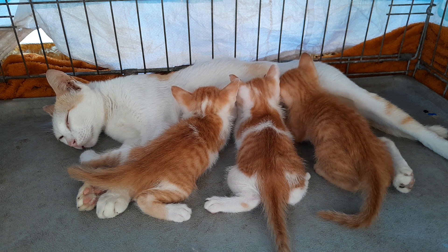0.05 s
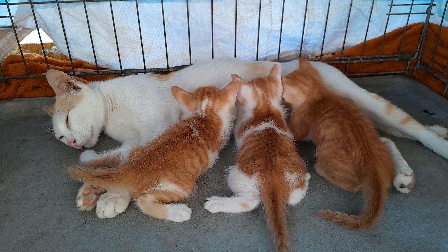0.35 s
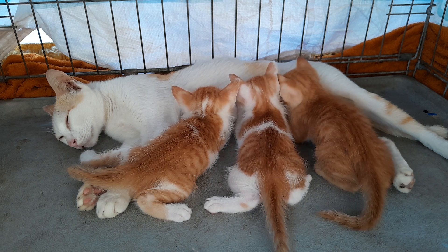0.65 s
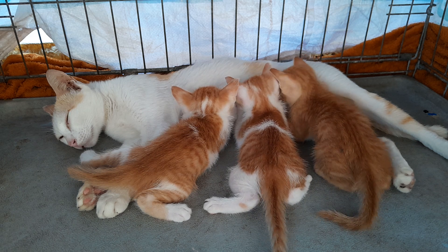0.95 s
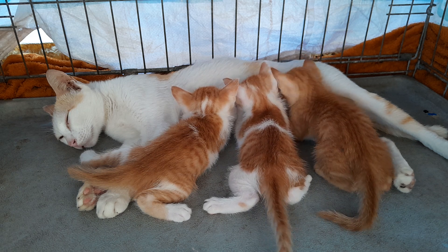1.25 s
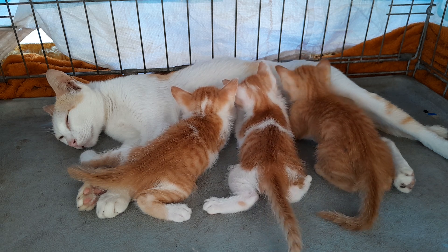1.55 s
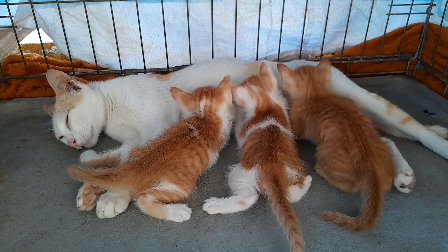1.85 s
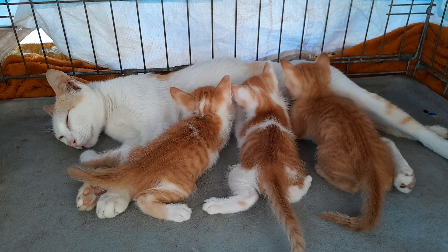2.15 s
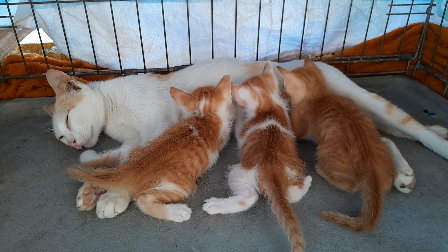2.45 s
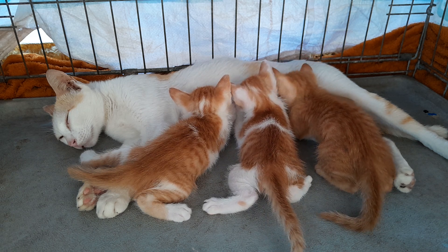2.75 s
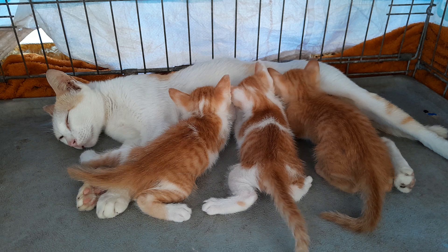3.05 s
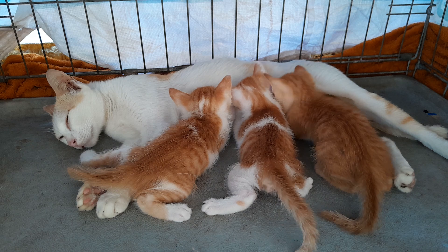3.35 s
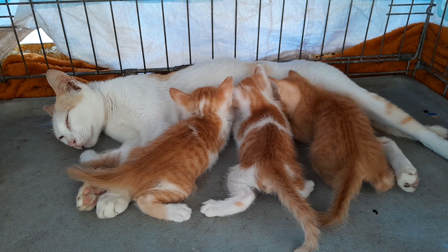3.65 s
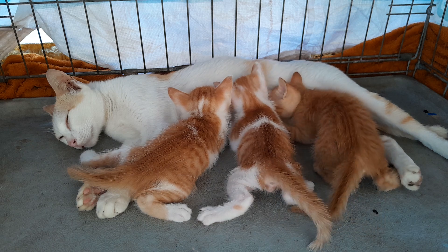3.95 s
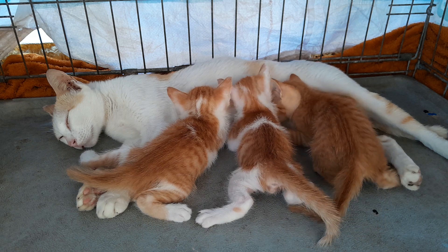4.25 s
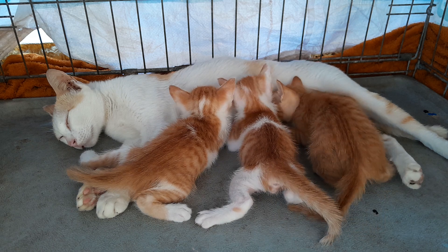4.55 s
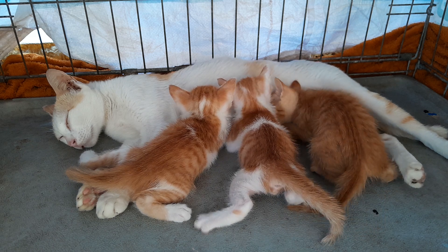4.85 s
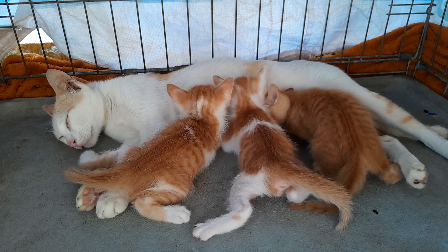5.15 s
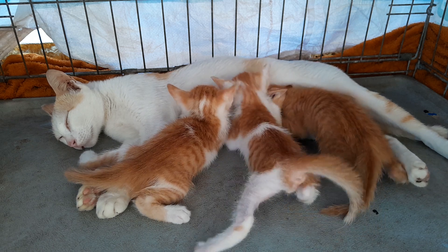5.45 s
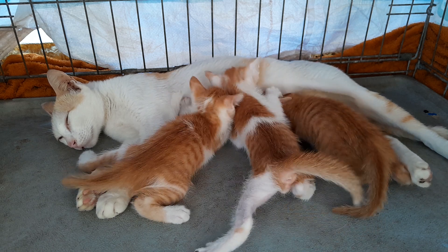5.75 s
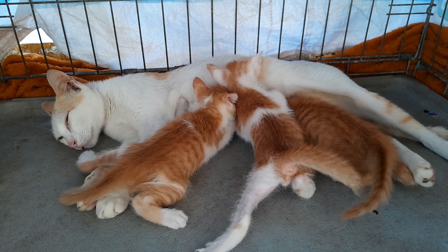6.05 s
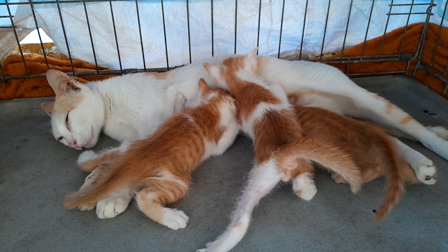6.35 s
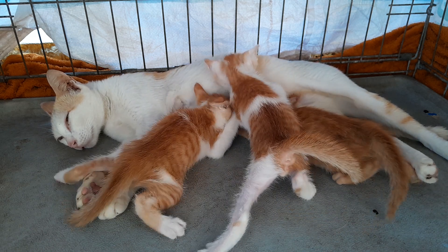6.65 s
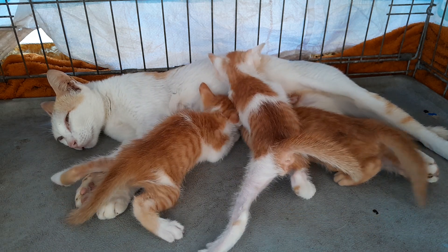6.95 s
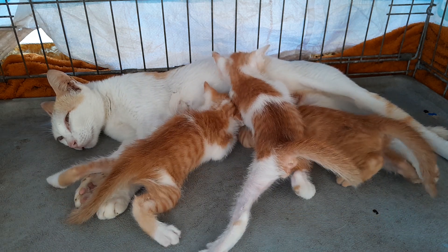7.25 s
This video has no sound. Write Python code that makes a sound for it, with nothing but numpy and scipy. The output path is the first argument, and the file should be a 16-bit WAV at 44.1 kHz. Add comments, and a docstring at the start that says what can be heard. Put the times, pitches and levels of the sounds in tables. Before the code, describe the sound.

Close up in a wire cage indoors, a low purring rumble runs throughout over faint hiss. At first only a few thin, falling chirps, like a small bird's, echo from further away. Then nursing kittens begin to jostle, with wet mouth smacks, claw ticks and fur rubbing against a hollow tray. The activity builds to a short flurry and eases to scattered clicks, with a soft low thump near the end.

```python
"""In a wire cage, kittens suckle and jostle at their mother's belly over a low purring rumble.
Mouths and claws click, paws and fur scuff; both ring in the floor tray and, faintly, in the wires.
A kitten's weight thumps softly on the floor. Thin, mostly falling chirps like a small bird's echo
from further off. Behind it all lie dull room noise, hiss and faint, very high squeaks."""
import sys
import numpy as np
from scipy import signal
from scipy.fft import rfft, irfft, next_fast_len
from scipy.io import wavfile
from scipy.ndimage import uniform_filter1d

SR = 44100
rng = np.random.default_rng(int(sys.argv[2]) if len(sys.argv) > 2 else 0)


def output_pcm(signal):
    """Save a mono or channel-first signal as 16-bit PCM at the path in sys.argv[1].

    Samples are clipped to [-1, 1] before scaling.
    """
    pcm = np.clip(np.atleast_2d(signal).T, -1, 1) * 32767
    wavfile.write(sys.argv[1], SR, np.round(pcm).astype(np.int16))


N = 325753
STIR_S = 3.8   # faint rubbing and suckling start here

# Spectrum of ticks and rubbing hiss. Each row: frequency in Hz, density in dB.
TICK_SPECTRUM = [(900, 0.5), (1800, -1), (2900, -1.5), (3700, 0.5), (5000, 0.5), (7000, 1), (8200, -1.5),
                 (10000, -4.5), (13000, -5.5), (16000, -7.5)]
# Stereo image of close sounds and echoes. Each row: frequency in Hz, left-right correlation.
NEAR_CORRELATION = [(400, 0.82), (800, 0.71), (1500, 0), (2500, 0)]


def from_db(db):
    """Decibels to gain."""
    return 10 ** (np.asarray(db) / 20)


def unit_rms(x):
    """Scale to unit power."""
    return x / np.sqrt(np.mean(x ** 2) + 1e-20)


def add(out, start_s, sound):
    """Mix a short sound in at start_s."""
    start = max(int(start_s * SR), 0)
    out[..., start:start + sound.shape[-1]] += sound[..., :N - start]


def at_bins(curve, size):
    """Interpolate (Hz, value) rows at the FFT bins, in log frequency."""
    hz, value = np.transpose(curve)
    return np.interp(np.log(np.fft.rfftfreq(size, 1 / SR) + 1), np.log(hz), value)


def colour(x, spectrum):
    """Filter by a curve of (Hz, dB) rows."""
    size = next_fast_len(x.shape[-1])
    return irfft(rfft(x, size) * from_db(at_bins(spectrum, size)), size)[..., :x.shape[-1]]


def lowpass(x, cut_hz):
    """Second-order treble cut."""
    return signal.sosfilt(signal.butter(2, cut_hz, fs=SR, output="sos"), x)


def resonate(x, hz, width_hz):
    """One resonance, unit peak gain."""
    r = np.exp(-np.pi * width_hz / SR)
    feedback = [1, -2 * r * np.cos(2 * np.pi * hz / SR), r * r]
    return signal.lfilter(np.array([1, 0, -1]) * (1 - r * r) / 2, feedback, x + 1e-18)


def stereo_noise(size, correlation=NEAR_CORRELATION):
    """White noise, left and right alike in the bass and unrelated in the treble."""
    alike = at_bins(correlation, size)
    mid, side = rfft(rng.standard_normal((2, size)))
    mid, side = mid * np.sqrt(1 + alike), side * np.sqrt(1 - alike)
    return irfft(np.array([mid + side, mid - side]), size)


def steady_noise(spectrum):
    """Coloured stereo noise of unit power."""
    # Each row: frequency in Hz, left-right correlation.
    correlation = [(60, 1), (120, 0.98), (240, 0.79), (480, 0.47), (750, 0.02), (1100, 0), (2000, 0.021),
                   (5000, 0)]
    return unit_rms(colour(stereo_noise(next_fast_len(N), correlation), spectrum)[:, :N])


def room(x, t60_s, build_s):
    """Diffuse reflections: a unit-energy tail builds up and dies."""
    t = np.arange(SR) / SR
    tail = stereo_noise(SR) * from_db(-60 * t / t60_s) * (1 - np.exp(-t / build_s))
    return signal.fftconvolve(x, unit_rms(tail) / np.sqrt(SR), axes=-1)[:, :N]


def background(air_db, waver_db, waver_per_s, hiss_db):
    """Dull, gently wavering room noise and thin, steady microphone hiss."""
    # Each row of both: frequency in Hz, density in dB.
    air_spectrum = [(20, -17.5), (150, -16), (240, -8), (330, -3), (450, 0), (700, -2.5), (1000, -11.5),
                    (1600, -19), (3000, -32), (12000, -72)]
    hiss_spectrum = [(940, -27), (1600, -3.5), (2240, -2), (3050, -3), (5440, -7.5), (7600, -11.5),
                     (8050, -7.5), (8900, -9.5), (9300, -12), (10700, -10), (12700, -7), (16000, -8)]
    waver = rng.standard_normal(N)
    for _ in range(2):
        waver = uniform_filter1d(waver, int(SR / waver_per_s), mode="wrap")
    air = from_db(air_db + waver_db * unit_rms(waver)) * steady_noise(air_spectrum)
    return air + from_db(hiss_db) * steady_noise(hiss_spectrum)


def purr(gain_db, drone_db):
    """Purring rumble: a deep band swells and sinks under a steady drone."""
    # Swell of the deep band. Each row: time in seconds, level in dB.
    swell = [(0.04, -34.5), (0.1, -39), (0.49, -41), (0.96, -39), (1.15, -32.5), (1.2, -40.5),
             (2.15, -39.5), (2.97, -45), (3.03, -38), (3.34, -36.5), (3.52, -46), (4.54, -44.5),
             (5.75, -38), (5.81, -48.5), (6.26, -40), (6.94, -44.5), (7.02, -36.5), (7.08, -47.5),
             (7.37, -37)]
    # Each row of both: frequency in Hz, density in dB.
    deep_spectrum = [(20, -61), (30, -31), (40, -8.5), (55, -8), (66, 1), (76, -0.5), (92, 3.5),
                     (115, -13.5), (138, -6.5), (165, -20), (260, -31.5), (1500, -110)]
    drone_spectrum = [(20, -55), (50, -37.5), (90, -6.5), (110, 1.5), (138, -1), (165, -16), (200, -12.5),
                      (240, -13.5), (320, -15), (400, -25), (1500, -100)]
    swell_db = np.interp(np.arange(N) / SR, *np.transpose(swell))
    deep = steady_noise(deep_spectrum)
    deep /= np.sqrt(uniform_filter1d(np.mean(deep ** 2, axis=0), size=4000))   # even out its power
    return from_db(swell_db + gain_db) * deep + from_db(drone_db) * steady_noise(drone_spectrum)


def squeaks(gain_db):
    """Narrow, very high bands of hiss that swell and fade."""
    # Each row: start and length in seconds, centre and half width in Hz, level in dB.
    bands = [(0.05, 0.46, 12600, 400, -83), (0.17, 0.21, 15000, 220, -76), (0.44, 0.082, 12600, 300, -79),
             (1.87, 0.33, 13200, 900, -81), (3.37, 0.05, 12800, 120, -84), (3.97, 0.27, 12800, 300, -76),
             (6.99, 0.1, 12900, 180, -79), (7.1, 0.2, 12400, 190, -82), (7.24, 0.15, 12750, 250, -78)]
    out = np.zeros((2, N))
    for start_s, length_s, hz, half_width_hz, db in bands:
        t = np.arange(int(length_s * SR)) / SR
        flicker = unit_rms(lowpass(rng.standard_normal((2, SR)), half_width_hz))[:, :len(t)]
        band = unit_rms(flicker * np.cos(2 * np.pi * hz * t))
        add(out, start_s, from_db(gain_db + db) * band * np.sin(np.pi * t / length_s))
    return out


def chirps(direct_db, echo_db, rasp_hz, flutter_hz, echo_cut_hz):
    """Bird-like glides and a few low peeps, roughened by pitch flutter, with a duller echo."""
    # Each row: start and length in seconds, first and last pitch in Hz, level in dB, rasp from 0 to 1.
    glides = [(0.01, 0.032, 4800, 3800, -77.5, 1), (0.376, 0.045, 1380, 1456, -80, 0),
              (0.455, 0.056, 1470, 1400, -80.5, 0.1), (0.926, 0.047, 5640, 3680, -65.5, 0.5),
              (0.959, 0.028, 4100, 4760, -66, 0.93), (2.453, 0.051, 5670, 3920, -65, 0.3),
              (2.456, 0.039, 5600, 6170, -71, 0.8), (2.488, 0.027, 4060, 3810, -56.5, 0.28),
              (2.502, 0.011, 6150, 5780, -58.5, 0.2), (2.512, 0.011, 6500, 6900, -64, 0.1),
              (2.594, 0.051, 7300, 5520, -66.5, 0.3), (2.636, 0.022, 5600, 3840, -57, 0.48),
              (2.655, 0.022, 5600, 4080, -70, 0.7), (3.123, 0.054, 5270, 3630, -71, 1),
              (4.356, 0.033, 950, 985, -65, 0.15)]
    out = np.zeros((2, N))
    for start_s, length_s, first_hz, last_hz, db, rasp in glides:
        along = np.linspace(0, 1, int(length_s * SR))
        flutter = unit_rms(resonate(rng.standard_normal(SR), flutter_hz, flutter_hz))[:len(along)]
        pitch_hz = first_hz * (last_hz / first_hz) ** along + rasp * rasp_hz * flutter
        envelope = np.sqrt(along * np.abs(np.sin(np.pi * along ** 1.36)))
        add(out, start_s, from_db(db) * envelope * np.sin(2 * np.pi * np.cumsum(pitch_hz) / SR))
    echo = room(lowpass(out, echo_cut_hz), t60_s=0.51, build_s=0.0012)
    return from_db(direct_db) * out + from_db(echo_db) * echo


def thumps(hz, swell_s):
    """A kitten's weight lands softly: a few low cycles swell and die."""
    # Each row: start in seconds, envelope peak in dB.
    landings = [(3.597, -34.5), (3.659, -35.5), (3.953, -33.5), (6.210, -29.5)]
    out, t = np.zeros(N), np.arange(SR // 4) / SR
    envelope = t / swell_s * np.exp(1 - t / swell_s)
    for start_s, db in landings:
        add(out, start_s, from_db(db) * envelope * np.sin(2 * np.pi * hz * t))
    return out


def wires(x, width_hz):
    """The cage wires ring on in narrow lines."""
    # Each row: frequency in Hz, gain in dB.
    modes = [(793, 6), (936, -2), (1130, -19), (1221, 0), (1393, -5), (1621, 3), (1714, 3), (1896, -5),
             (2740, -5), (3008, -4), (3318, -8), (4426, -9)]
    return sum(from_db(db) * resonate(x, hz, width_hz) for hz, db in modes)


def tray(x, uneven_db=0, detune=0):
    """Hollow floor tray; its resonances can vary in gain and pitch with the spot struck."""
    # Each row: frequency and width in Hz, gain in dB.
    modes = [(430, 98, -9), (670, 135, -3), (785, 86, 3.5), (1120, 190, -10), (1330, 190, -3.5),
             (1580, 390, -7.5), (1984, 160, -5.5), (2950, 630, -16.5)]
    spot_db = uneven_db * rng.uniform(-1, 1, len(modes))
    shift = 1 + detune * rng.uniform(-1, 1, len(modes))
    return sum((-1) ** (k + 1) * from_db(db + spot_db[k]) * resonate(x, hz * shift[k], width_hz)
               for k, (hz, width_hz, db) in enumerate(modes))


def rubbing(size, catches_per_s, spread_db=6, grain_s=0.00084):
    """Friction: a stream of small uneven catches, each a puff of noise."""
    caught = rng.random(size) < catches_per_s / SR
    catches = caught * from_db(spread_db * np.clip(rng.standard_normal(size), -2, 2))
    power = signal.lfilter([1], [1, -np.exp(-1 / (grain_s * SR))], catches ** 2 + 1e-18)
    return stereo_noise(size) * np.sqrt(power)


def scrape(rub, hz, width_hz=250, span_octaves=0.37, spot_s=0.0033, pitches=7):
    """A dragged claw skips from spot to spot, each ringing briefly at its own pitch."""
    skip = (np.arange(rub.shape[1]) / SR / spot_s).astype(int)
    spot = rng.integers(0, pitches, SR)[skip]
    return sum(resonate(rub * (spot == k), hz * 2 ** octave, width_hz)
               for k, octave in enumerate(np.linspace(-span_octaves, span_octaves, pitches)))


def stirring(catches_per_s, tray_db, hiss_db):
    """Faint continuous rubbing once the kittens stir."""
    rub = rubbing(next_fast_len(N), catches_per_s)[:, :N]
    hollow = from_db(tray_db) * unit_rms(tray(rub))
    hiss = from_db(hiss_db) * unit_rms(colour(rub, TICK_SPECTRUM))
    return (hollow + hiss) * (np.arange(N) / SR > STIR_S)


def scuffs(body_gain_db, hiss_gain_db, scrape_db, rise_share, fall_share):
    """Shoves swell and let go: crackly where claws drag, smooth where fur slides."""
    # Each row: start and length in seconds, body and hiss in dB, scrape pitch in Hz, catches per second.
    shoves = [(3.554, 0.063, -78, -57.5, 1400, 850), (3.788, 0.2, -68, -58.5, 1480, 380),
              (4.359, 0.2, -73, -72.5, 1280, 630), (4.77, 0.17, -59, -85, 1400, 570),
              (4.979, 0.29, -58, -65, 860, 320), (5.158, 0.12, -48, -61, 1650, 550),
              (5.243, 0.14, -42.5, -52, 1630, 900), (5.254, 0.07, -43.5, -58, 3020, 870),
              (5.309, 0.093, -49, -57, 845, 310), (5.463, 0.32, -60, -74, 1580, 290),
              (5.746, 0.49, -67.5, -75, 1460, 590), (6.529, 0.12, -52.5, -55.5, 740, 3000),
              (6.579, 0.096, -50, -52, 746, 3200), (6.834, 0.069, -58, -60, 1060, 610),
              (7.238, 0.1, -73, -65.5, 1390, 370)]
    out = np.zeros((2, N))
    for start_s, length_s, body_db, hiss_db, hz, catches_per_s in shoves:
        rub = rubbing(SR, catches_per_s)[:, :int(length_s * SR)]
        body = unit_rms(tray(rub)) + from_db(scrape_db) * unit_rms(scrape(rub, hz))
        shove = from_db(body_db + body_gain_db) * unit_rms(body)
        shove += from_db(hiss_db + hiss_gain_db) * unit_rms(colour(rub, TICK_SPECTRUM))
        along = np.linspace(0, 1, shove.shape[1])
        ramp = np.clip(np.minimum(along / rise_share, (1 - along) / fall_share), 0, 1)
        add(out, start_s, shove * np.sin(np.pi / 2 * ramp) ** 2)
    return out


def suckling(count, knock_db, tick_db, spread_db, pitch_hz, slip_s):
    """Rows for clicks(): faint wet mouth clicks, loosely spaced from STIR_S on."""
    starts_s = STIR_S + (np.arange(count) + rng.random(count)) / count * (N / SR - STIR_S)
    offsets_db = spread_db * rng.uniform(-1, 1, (count, 3))
    return [(start_s, knock_db + knock_offset, tick_db + tick_offset, pan_db, pitch_hz, slip_s)
            for start_s, (knock_offset, tick_offset, pan_db) in zip(starts_s, offsets_db)]


def clicks(faint_rows, knock_gain_db, tick_gain_db, grit_db, snap_db, swell_s, size=4096):
    """Mouth and claw clicks: tiny slips tick directly and, with a snap, knock through the tray."""
    # Each row: start in seconds, knock, tick and left-over-right in dB, knock pitch in Hz,
    # slip decay in seconds.
    clear_rows = [(3.573, -67, -57.5, -2, 780, 0.0049), (3.594, -60, -66, 0, 1480, .005),
                  (3.659, -52.5, -65.5, -2, 1220, 0.003), (3.839, -56, -47.5, -1, 760, 0.0053),
                  (3.879, -70, -50, -1, 1550, .004), (3.914, -53.5, -60, 3, 960, 0.0034),
                  (3.923, -58, -54, 2, 1400, 0.006), (3.951, -59, -57.5, 4, 805, .005),
                  (4.036, -69, -62.5, -4, 900, .005), (4.057, -73, -64.5, 1, 900, .005),
                  (4.143, -60, -61, 0, 814, 0.0055), (4.248, -74, -64, 5, 836, 0.0044),
                  (4.296, -74, -63, -4, 720, .005), (4.390, -72, -64.5, -4, 950, .004),
                  (4.435, -73, -62, 1, 900, .005), (4.475, -54, -59.5, 1, 780, 0.0042),
                  (4.651, -47, -49.5, 0, 1460, 0.0029), (4.668, -45.5, -44, 1.5, 785, 0.018),
                  (4.723, -52, -60.5, 1, 880, 0.0025), (4.785, -59, -64.5, 4, 1400, .003),
                  (4.797, -43.5, -71, 0, 760, 0.0026), (4.814, -62, -52, 0, 1390, .003),
                  (4.819, -43, -49, 2, 1450, 0.0025), (4.838, -40, -50, 1, 1540, 0.0022),
                  (4.868, -34, -71, -4, 1700, 0.0021), (4.881, -46, -48, 2, 756, 0.0032),
                  (4.911, -36, -48, 2, 670, 0.0014), (4.928, -42, -59, 0, 1270, 0.0028),
                  (4.935, -40.5, -72, -4, 670, 0.0025), (4.949, -51, -72, 2, 1500, .003),
                  (4.996, -44.5, -56, -1, 780, 0.0026), (5.014, -46.5, -65, 2, 1400, 0.0018),
                  (5.036, -51.5, -48.5, -2, 2150, 0.0044), (5.112, -42.5, -57.5, 3, 750, 0.0064),
                  (5.124, -47, -49, -1, 1280, 0.008), (5.137, -47, -53.5, 0, 850, 0.0037),
                  (5.169, -62, -62, 4, 800, 0.0044), (5.177, -49, -59, 0, 1700, .002),
                  (5.187, -51, -65, 0, 1900, 0.0018), (5.195, -42.5, -70, -8, 1520, 0.0023),
                  (5.212, -38.5, -49, 1, 1480, 0.0036), (5.247, -33, -45, -3.5, 1520, 0.0014),
                  (5.260, -45, -51, 5, 1600, 0.0025), (5.268, -40.5, -61, -7, 1500, 0.0015),
                  (5.281, -38, -67, -4, 1390, 0.0031), (5.289, -32.5, -41.5, 1, 1600, 0.0018),
                  (5.300, -36, -41, 1, 1610, 0.0022), (5.310, -53, -64, 0, 1400, 0.0022),
                  (5.320, -54, -48, -4, 840, 0.0033), (5.333, -32.5, -47.5, -3, 820, 0.0043),
                  (5.341, -37, -42.5, 2, 800, 0.0027), (5.375, -49, -60, 1, 800, .003),
                  (5.396, -38.5, -53, 0, 1350, 0.0044), (5.442, -43, -60.5, -3, 680, 0.0033),
                  (5.465, -58, -59, 5, 1500, .002), (5.481, -52, -51, 0, 2040, .003),
                  (5.507, -40.5, -47, 1, 804, 0.0056), (5.513, -44, -41, 0, 800, 0.008),
                  (5.526, -43.5, -56, -3, 1400, .003), (5.540, -45, -72, 1, 850, 0.0018),
                  (5.563, -48, -53.5, 0, 800, .006), (5.599, -47, -51.5, 1, 1660, 0.0027),
                  (5.617, -44, -64, 0, 1650, .002), (5.626, -50, -54, -2, 1490, 0.0054),
                  (5.677, -49, -72, -9, 1600, 0.0045), (5.686, -46.5, -63.5, 4, 700, 0.0028),
                  (5.708, -55, -72, -8, 690, 0.0041), (5.799, -55, -60, -2, 750, 0.0057),
                  (5.808, -64, -58.5, -1, 800, .005), (5.856, -60, -66, -4, 1300, 0.0035),
                  (5.897, -42.5, -60, -3.5, 780, 0.0052), (5.953, -59, -65.5, 0, 1480, .002),
                  (5.991, -52.5, -60.5, -2, 1940, 0.0023), (6.058, -56, -50.5, 1, 664, 0.0042),
                  (6.099, -53.5, -63, -2, 1500, .003), (6.192, -49.5, -54, -3, 845, 0.0028),
                  (6.206, -48, -45, 0, 1040, 0.014), (6.286, -68, -48.5, -3, 1480, .004),
                  (6.366, -42, -55, -2.5, 910, 0.0025), (6.450, -61, -69, 0, 1500, .004),
                  (6.854, -50.5, -51, 2, 690, 0.0076), (6.921, -56, -52.5, -4, 710, 0.0074),
                  (7.003, -58, -59, -1, 1920, 0.0046), (7.114, -64, -57, -1, 695, 0.0049)]
    out, t = np.zeros((2, N)), np.arange(size) / SR
    onset = t < 0.008   # levels are set over this span
    for start_s, knock_db, tick_db, pan_db, hz, slip_s in clear_rows + faint_rows:
        grit = from_db(grit_db * np.repeat(rng.standard_normal(size // 32), 32))
        slips = stereo_noise(size) * grit
        push = slips * np.exp(-t / slip_s)
        push[:, int(swell_s / 2 * SR)] += from_db(snap_db) * np.linalg.norm(push[0])
        push += from_db(3.5) * resonate(push, hz, width_hz=230)   # each spot favours one pitch
        knock = lowpass(tray(push, uneven_db=4.5, detune=0.04), cut_hz=2600)
        tilt_db_per_octave = 0.032 * (tick_db + 52)   # harder ticks are brighter
        spectrum = [(f, db + tilt_db_per_octave * np.log2(f)) for f, db in TICK_SPECTRUM]
        tick = colour(slips * t * np.exp(-t / swell_s), spectrum) * (t < t[-1] / 2)
        tick += resonate(tick, hz=rng.uniform(4600, 7900), width_hz=510)   # wet ping
        click = from_db(knock_db + knock_gain_db) * knock / knock[:, onset].std()
        click += from_db(tick_db + tick_gain_db) * tick / tick[:, onset].std()
        add(out, start_s, click * from_db([[pan_db / 2], [-pan_db / 2]]))
    return out


def scene():
    """Kittens close by in the cage; purr, room noise and chirps around them."""
    bed = purr(gain_db=0.5, drone_db=-48.5)
    bed += background(air_db=-62, waver_db=1.66, waver_per_s=12, hiss_db=-74)
    bed += squeaks(gain_db=1.5)
    bed *= from_db([[0.45], [-0.45]])   # slightly left
    far = chirps(direct_db=2, echo_db=14, rasp_hz=666, flutter_hz=350, echo_cut_hz=3850)
    kittens = stirring(catches_per_s=530, tray_db=-72.5, hiss_db=-80.5)
    kittens += scuffs(body_gain_db=-4, hiss_gain_db=-3, scrape_db=0.5, rise_share=0.2, fall_share=0.3)
    faint = suckling(count=14, knock_db=-67, tick_db=-70.5, spread_db=2, pitch_hz=770, slip_s=0.003)
    kittens += clicks(faint, knock_gain_db=-4, tick_gain_db=0.5, grit_db=2, snap_db=-3.5, swell_s=0.002083)
    cage = kittens + from_db(-4.5) * wires(kittens, width_hz=6.4)
    reflections = from_db(-3.5) * room(cage, t60_s=0.056, build_s=0.0021)
    reverb = from_db(-10) * room(cage, t60_s=0.46, build_s=0.00023)
    return bed + far + thumps(hz=77.4, swell_s=0.0097) + cage + reflections + reverb


def record(dry):
    """Steep low-pass at 16 kHz."""
    return signal.sosfilt(signal.ellip(10, 0.1, 80, 16000, fs=SR, output="sos"), dry)


dry = scene()
out = record(dry)
output_pcm(out)
```